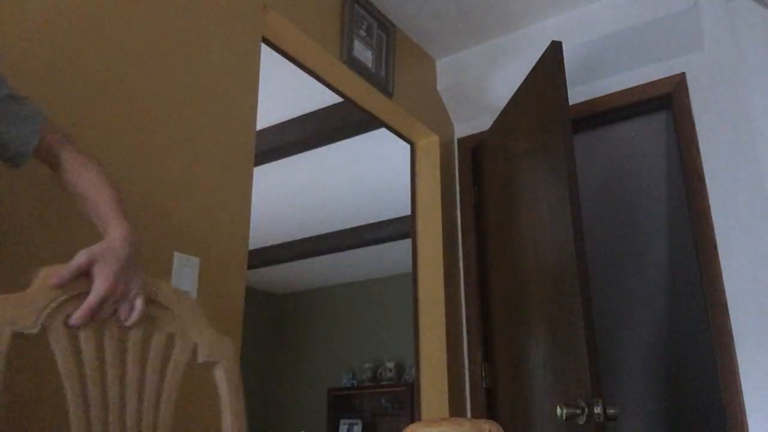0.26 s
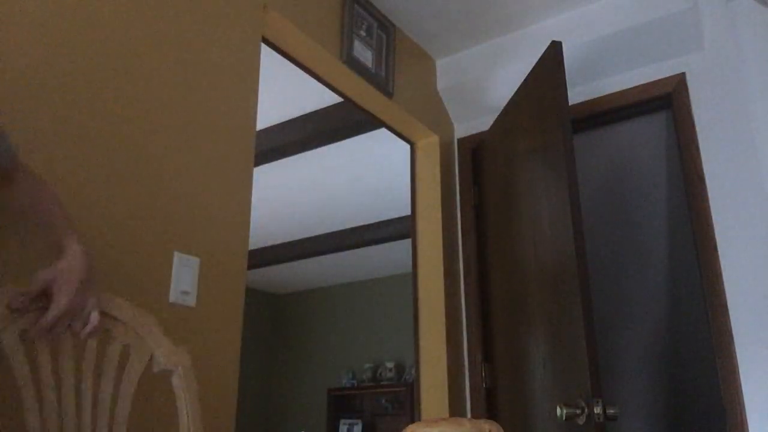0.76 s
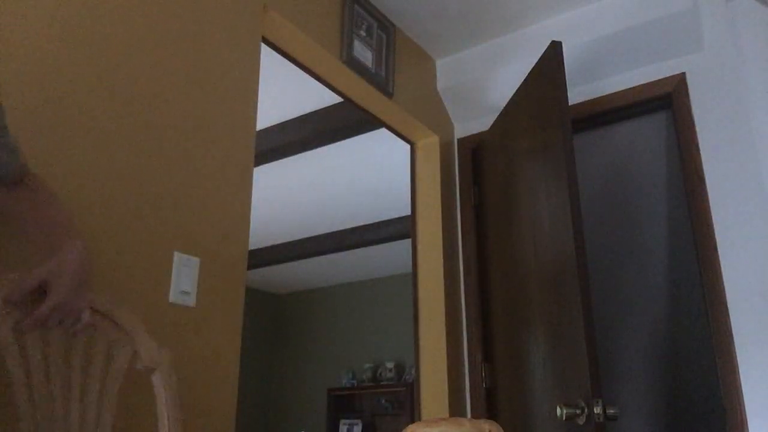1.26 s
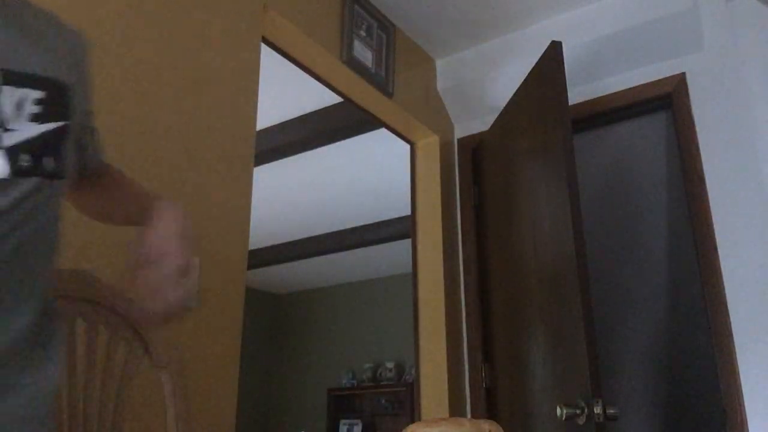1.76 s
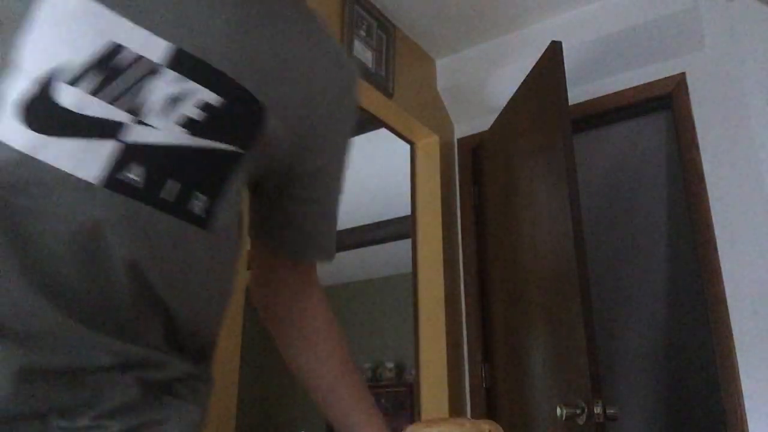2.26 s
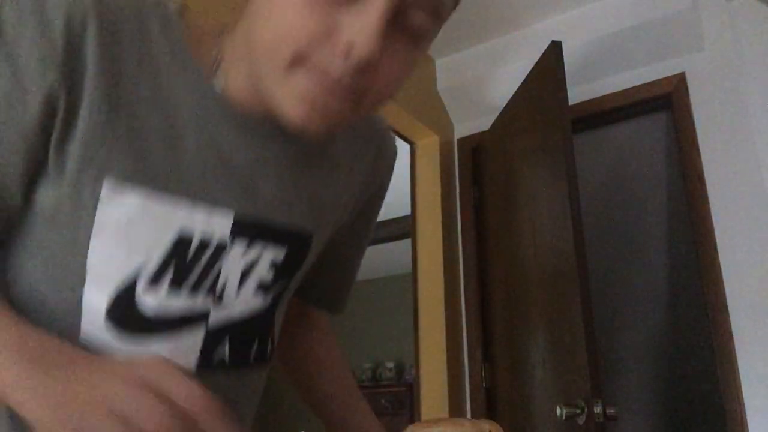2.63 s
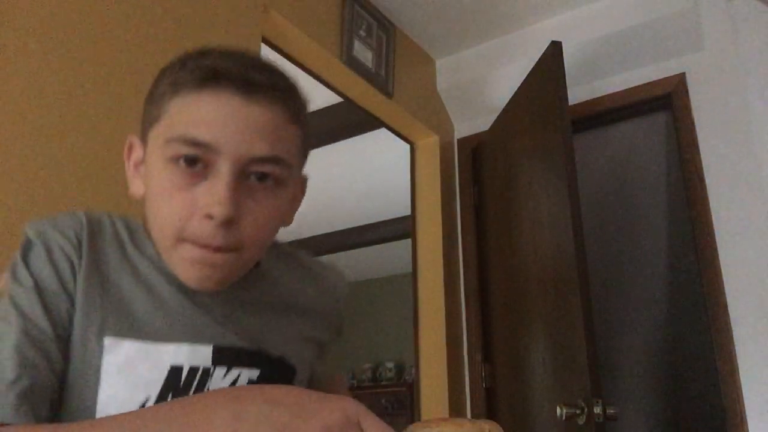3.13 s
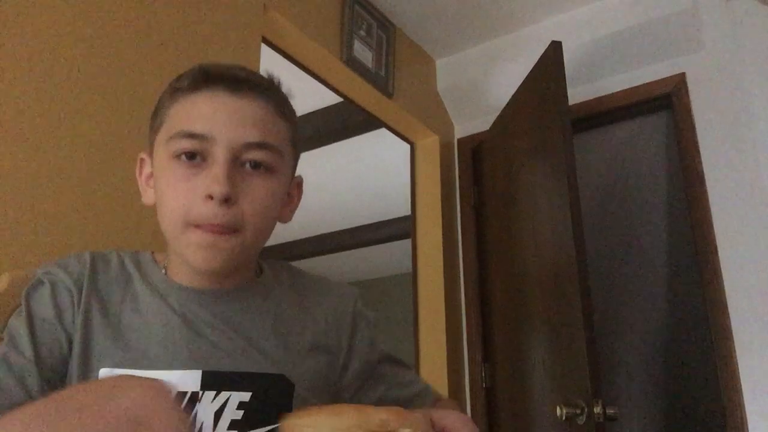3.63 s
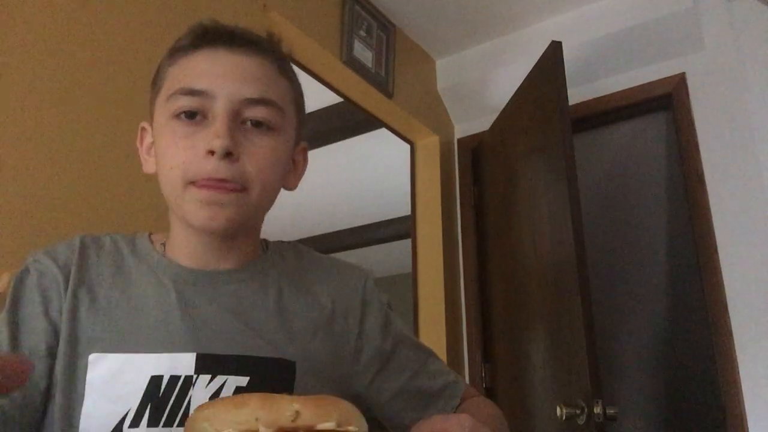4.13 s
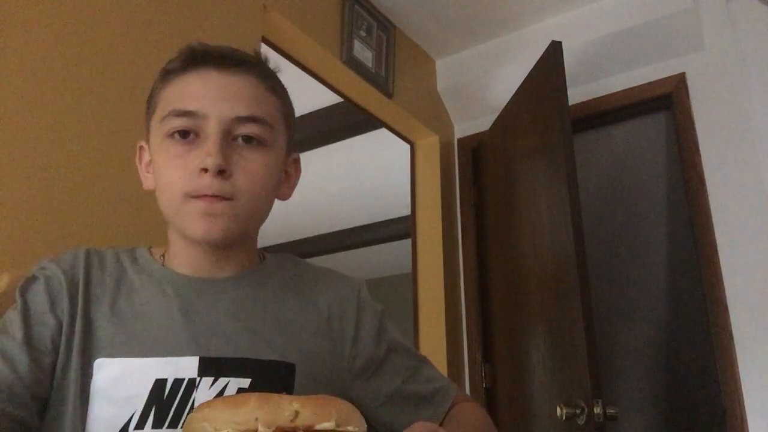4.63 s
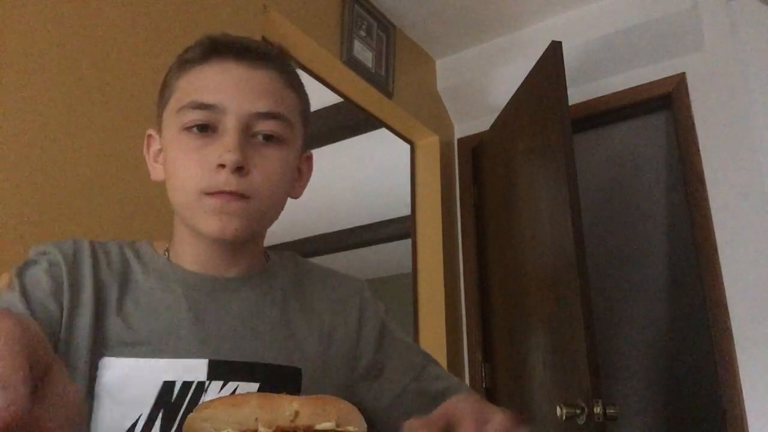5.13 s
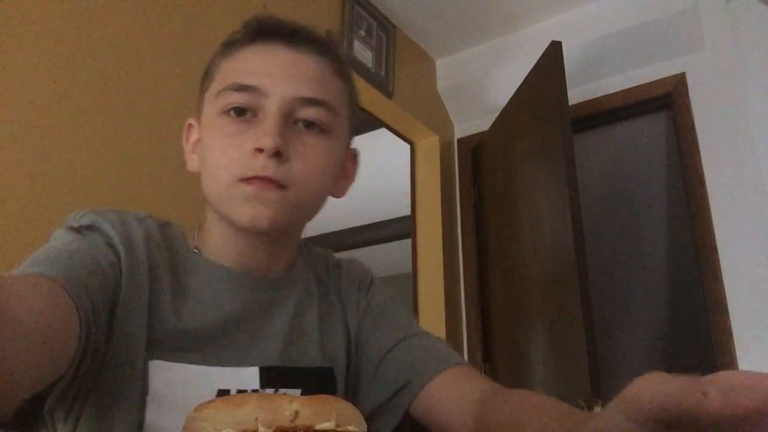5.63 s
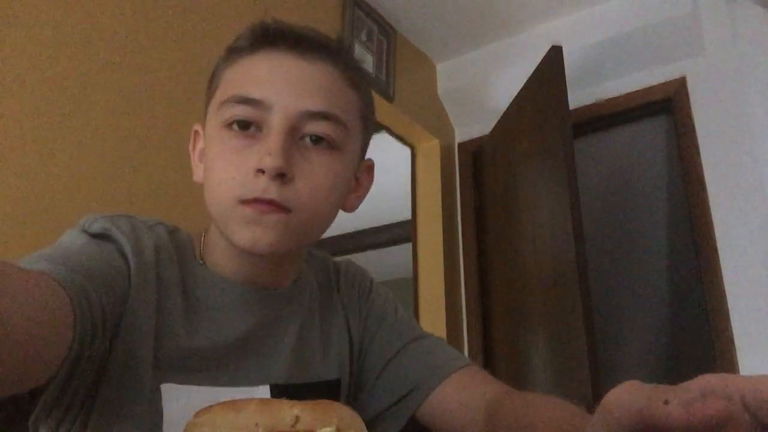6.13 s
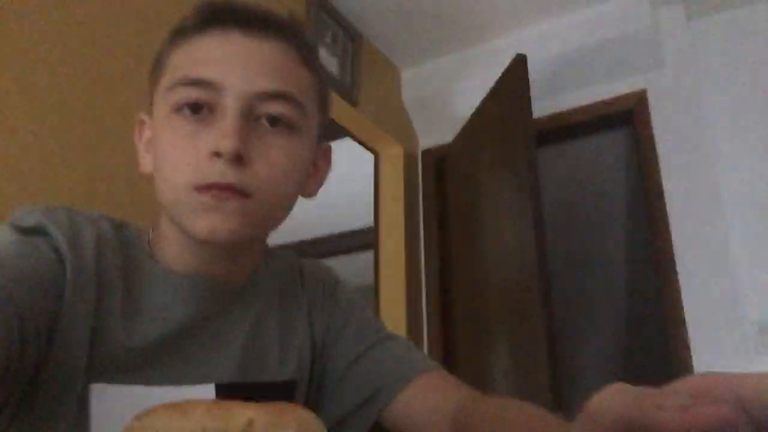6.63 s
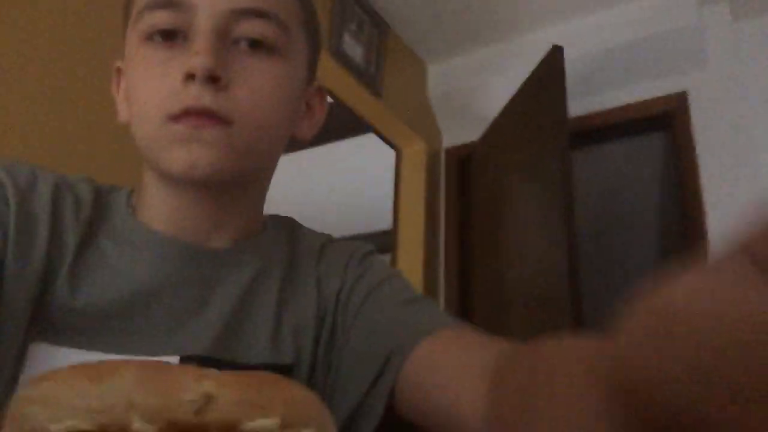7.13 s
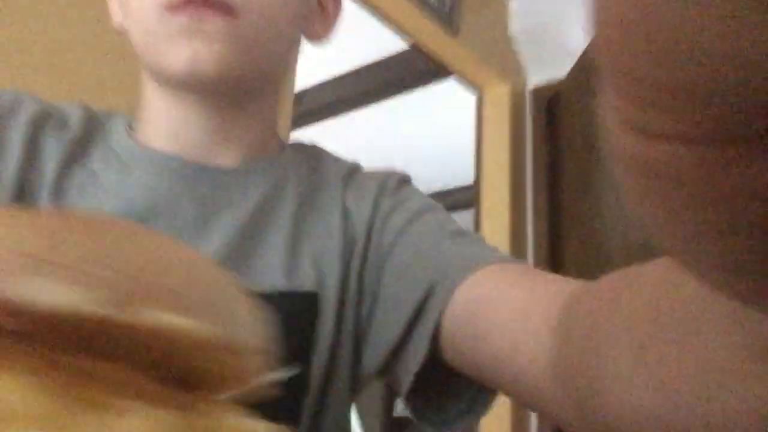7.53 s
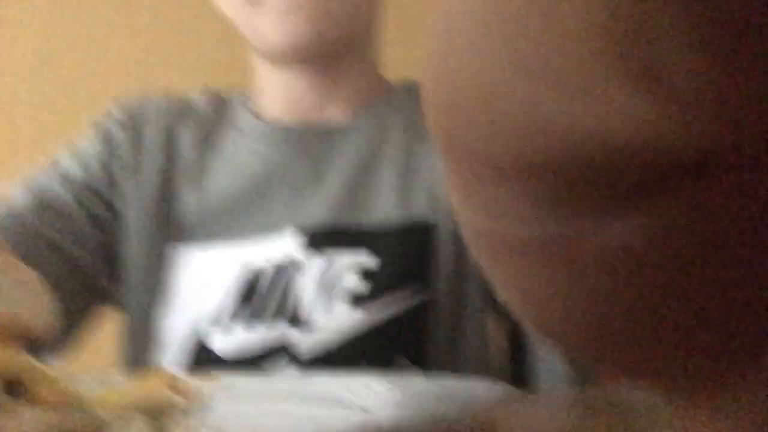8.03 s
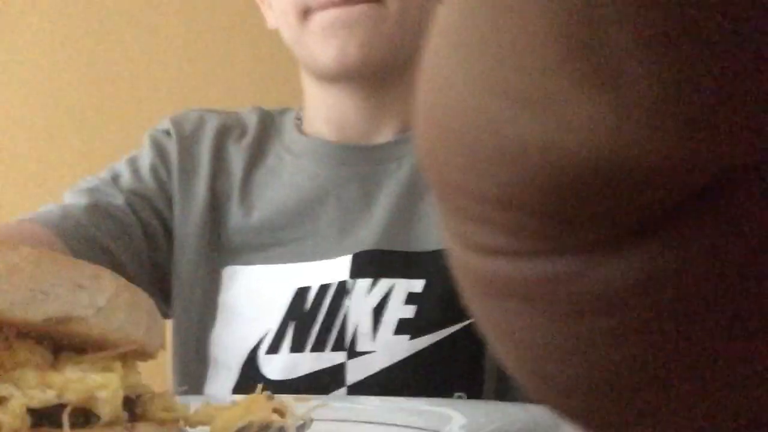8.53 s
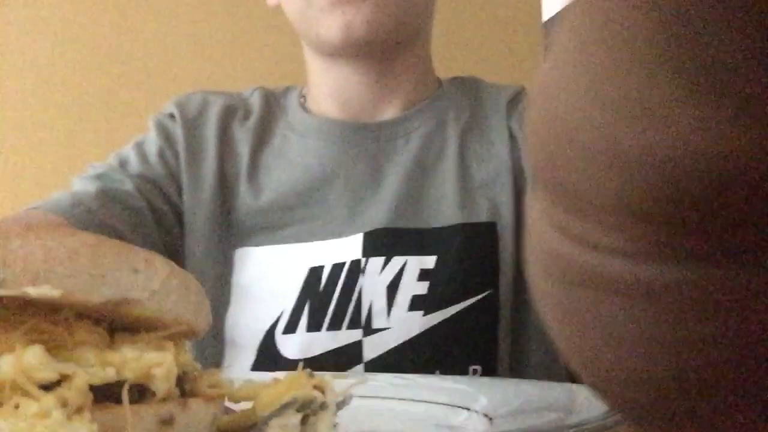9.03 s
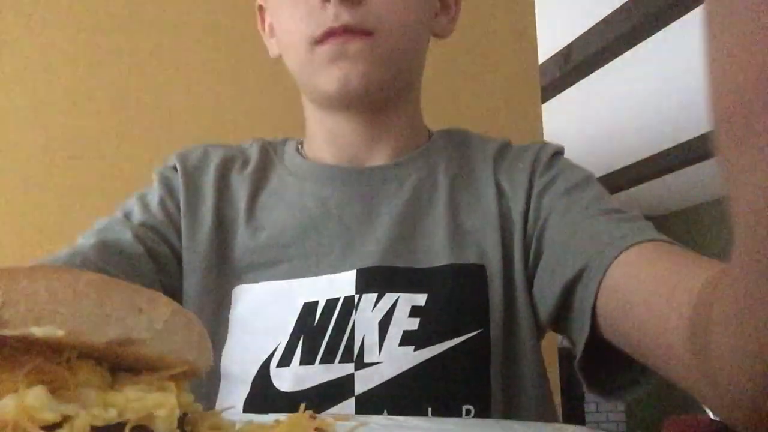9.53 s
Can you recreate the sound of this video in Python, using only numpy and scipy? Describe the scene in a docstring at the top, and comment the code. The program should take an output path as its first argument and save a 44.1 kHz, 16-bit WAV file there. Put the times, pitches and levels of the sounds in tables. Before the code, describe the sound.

Juddering chair-leg scrape, table knocks and a china plate landing, a short groaning scoot, then loud close skin rubbing and tapping on the recorder's case.

```python
"""A wooden chair is dragged over a kitchen floor in two pulls: stick-slip pulses ring its frame and grit.
Knocks sound at the table, a plate slides, lands and chatters on it, and the loaded chair is scooted in.
Then hands grab the recorder: skin rubs, skips and taps on its case as dispersed, thudding contacts.
Faint hum, clothes and room air lie underneath."""
import sys
import numpy as np
from scipy import signal
from scipy.fft import rfft, irfft, next_fast_len
from scipy.io import wavfile
from scipy.ndimage import uniform_filter1d, map_coordinates

SR = 44100
rng = np.random.default_rng(int(sys.argv[2]) if len(sys.argv) > 2 else 0)


def pcm_store(signal):
    """Save signal as 16-bit PCM."""
    levels = np.round(np.clip(np.atleast_2d(signal), -1, 1) * 32767)
    wavfile.write(sys.argv[1], SR, levels.astype(np.int16).T)


N = 431298

# Two pulls on the chair. Each row: time in seconds, frame boom in dB, grit in dB, both before trim.
PULLS = [
    [(0.0, -44, -58.5), (0.044, -29.5, -38), (0.182, -19, -41), (0.296, -15, -34), (0.476, -17.5, -31),
     (0.706, -26.5, -36.5), (0.81, -41.5, -61.5), (1.124, -58.5, -85), (1.15, -57, -83)],
    [(1.15, -57, -76), (1.204, -60, -83), (1.28, -25.5, -47.5), (1.348, -20.5, -38), (1.408, -25, -39),
     (1.516, -20.5, -36), (1.616, -38, -49), (1.874, -53, -80), (2.05, -71, -88)],
]
# Leg stick-slip. Each row: time in seconds, nominal slips per second, unevenness 0-1, upper harmonics in dB.
LEG_SLIP = [(0, 132, .05, -20), (.07, 130, .1, -20), (.13, 92, .3, -22), (.52, 90, .22, -14),
            (.61, 88, .05, 1), (.77, 90, .05, 2), (.88, 93, .1, -14), (1.25, 88, .12, -18),
            (2, 90, .2, -14)]
# Chair frame resonances. Each row: centre in Hz, width in Hz, relative level in dB.
FRAME_MODES = [(157, 20, 4), (192, 20, 2), (228, 22, -1), (262, 18, 1), (313, 26, -17), (440, 20, -26),
               (560, 40, -21)]
# Grit spectrum. Each row: frequency in Hz, relative level in dB.
GRIT_SPECTRUM = [(200, -15), (400, -12), (600, 2), (800, 3), (1000, 0), (1500, -5), (2100, -11),
                 (3200, -20), (5000, -30.5), (9000, -56.5)]
# Sandy hiss spectrum. Each row: frequency in Hz, relative level in dB.
SAND_SPECTRUM = [(1500, -18), (3500, 1), (4600, -6.5), (7000, -5.5), (8500, -17.5), (12300, -22.5),
                 (14500, -47)]
# A foot catches and hisses more. Each row: time in seconds, extra hiss in dB.
FOOT_CATCHES = [(0.02, 16), (0.265, 8.5), (0.33, 10), (0.465, 10), (0.83, 19), (1.29, 7), (1.5, 11.5)]
SAND_RE_GRIT_DB, CATCH_DECAY_S = -22.5, .066  # decay: time constant of the extra dB
# One leg judders steadily. Each row: start in seconds, end in seconds, level in dB before trim.
LEG_JUDDERS = [(0.045, 0.1, -26.5), (0.13, 0.42, -31), (0.46, 0.71, -26.5), (0.87, 0.99, -41),
               (1.29, 1.52, -26), (1.6, 1.92, -52.5)]
JUDDER_ATTACK_S_PER_20DB, JUDDER_RELEASE_S_PER_20DB = .06, .09

# Appliance hum. Each row: frequency in Hz, mean level in dB.
APPLIANCE_HUM = [(48.4, -62.5), (145.3, -69.5), (296.1, -74)]
# Room air spectrum. Each row: frequency in Hz, relative level in dB.
AIR_SPECTRUM = [(20, -33), (45, -6), (75, -9), (150, -7), (290, -8.5), (480, -17.5), (900, -20.5),
                (2000, -29), (6500, -35.5), (10000, -41), (16000, -40)]
# Clothes rustle. Each row: start in seconds, end in seconds, mean level in dB.
CLOTHES_RUSTLES = [(2.42, 2.8, -74.5), (2.9, 3.15, -68), (5.53, 5.7, -71.5), (9.35, 9.78, -72.5)]
RUSTLE_FADE_S_PER_20DB = .2
# Kitchen reverberation. Each row: frequency in Hz, time to fall 60 dB in seconds.
KITCHEN_DECAY = [(100, 0.55), (2000, 0.28), (6000, 0.13), (13000, 0.12)]

# Knocks at the table. Each row: time in seconds, wood in dB, bright part in dB, both before trim.
TABLE_KNOCKS = [(2.42, -44, -72), (2.885, -42.5, -62), (3.015, -54, -59), (3.105, -53.5, -50),
                (3.264, -49.5, -75), (3.403, -29.5, -38), (3.609, -16.5, -58), (3.619, -21.5, -24.5),
                (3.633, -28, -24.5), (3.722, -27, -37), (4.115, -40, -65), (4.768, -43, -41),
                (5.54, -55, -49), (5.67, -53, -60)]
# Table wood spectrum. Each row: frequency in Hz, relative level in dB.
TABLE_SPECTRUM = [(60, -26), (120, -5.5), (165, 1.5), (245, -1.5), (340, 2), (400, 2), (500, -7), (700, -8),
                  (1050, -5), (1700, -17), (2500, -22), (4000, -24.5), (8000, -59.5)]
# Bright part of a knock. Each row: frequency in Hz, relative level in dB.
CRACK_SPECTRUM = [(1500, -15), (3200, 1), (4200, -0.5), (6500, -8.5), (8500, -22), (12000, -27),
                  (16000, -42)]
# The plate slides on the table. Values: start in seconds, end in seconds, rumble in dB, chatter in dB.
PLATE_SLIDE = (3.39, 3.5, -41.5, -58)
# The plate rocks to rest on its rim. Values: start in seconds, end in seconds, rumble in dB, chatter in dB.
PLATE_SETTLE = (3.635, 3.645, -27.5, -28.5)
RUMBLE_ATTACK_S_PER_20DB, RUMBLE_RELEASE_S_PER_20DB = .06, .33
CHATTER_ATTACK_S_PER_20DB, CHATTER_RELEASE_S_PER_20DB = .018, .16
# The plate lands. Each row: time in seconds, snap in dB, thud in dB, nominal thud pitch in Hz.
PLATE_LANDING = [(3.6018, -4, -11, 430)]
# Plate resonances. Each row: centre in Hz, width in Hz, relative level in dB.
CHINA_MODES = [(1210, 70, 1), (2680, 140, -2), (3510, 55, 4), (3650, 60, 2), (4365, 55, 2.5),
               (5000, 200, -14), (6000, 350, -12), (7327, 130, -15), (9679, 80, -15), (11030, 160, -17),
               (12470, 200, -17)]
CHINA_DENSE_DB = -4  # its many weaker modes, relative to those

# Scooting in under load. Values: start in seconds, end in seconds.
SCOOT_SPAN = (4.475, 4.794)
# Loaded chair resonances. Each row: centre in Hz, width in Hz, relative level in dB.
LOADED_MODES = [(201, 11.5, 6), (205, 26, -3), (244.5, 17, 0.5), (312, 61, -10), (455, 38, -5.5),
                (585, 18, -8.5), (613, 19, -14), (731, 8.7, -5), (855, 37, -36), (1214, 120, -16),
                (2470, 960, -59)]
# Chair feet resonances. Each row: nominal centre in Hz, width in Hz, relative level in dB.
FEET_MODES = [(4430, 180, 0), (5170, 780, -15), (6880, 530, -18), (9530, 160, -14.5), (11450, 420, -19.5),
              (12300, 300, -22)]
# levels hold at mid-scoot
GROAN_DB, GROAN_SWELL_DB_PER_S = -33.5, 29
GROAN_ATTACK_S_PER_20DB, GROAN_RELEASE_S_PER_20DB = .071, .056
FEET_DB, FEET_SWELL_DB_PER_S = -55.5, 16.5
FEET_ATTACK_S_PER_20DB, FEET_RELEASE_S_PER_20DB = .11, .07
FEET_SAG_PER_S = .07  # share of pitch lost per second

# Skin strokes on the case. Each row: start in seconds, end in seconds, friction in dB, palm in dB before trim.
SKIN_RUBS = [(6.11, 6.15, -53.5, -40), (6.23, 6.28, -63, -40.5), (6.4, 6.47, -39.5, -35),
             (6.5, 6.58, -33, -32.5), (6.62, 6.97, -28, -28.5), (7.0, 7.27, -34, -29),
             (7.32, 7.41, -27, -20.5), (7.43, 7.56, -30.5, -15), (7.58, 7.67, -38, -22.5),
             (7.7, 7.87, -43, -32.5), (7.9, 8.16, -47.5, -26), (8.5, 8.57, -52.5, -48),
             (8.68, 8.74, -45.5, -42.5), (8.78, 8.92, -57.5, -43.5), (9.14, 9.29, -57, -48)]
RUB_ATTACK_S_PER_20DB, RUB_RELEASE_S_PER_20DB = .048, .055
# Skin friction spectrum. Each row: frequency in Hz, relative level in dB.
SKIN_SPECTRUM = [(410, -9), (700, -2), (1100, -8.5), (1700, -6), (2500, -6.5), (3300, -9.5), (4900, -18),
                 (7500, -22), (8800, -34), (10000, -51), (11500, -46.5), (15600, -65.5)]
# Palm drag spectrum. Each row: frequency in Hz, relative level in dB.
PALM_SPECTRUM = [(40, -15), (150, -2), (320, 5), (600, 3.5), (1000, -7), (2500, -39.5)]
SKIP_LIMIT_DB = -25  # cap on the small skips, before trim
# Light palm slides. Each row: start in seconds, end in seconds, swish in dB, fizz in dB before trim.
PALM_SWISHES = [(6.6, 6.68, -40, -50), (6.92, 7.0, -42, -53), (8.2, 8.24, -44, -61), (8.26, 8.35, -38, -55),
                (8.43, 8.55, -44.5, -64), (8.67, 8.73, -44, -66), (8.77, 8.92, -53, -78)]
SWISH_ATTACK_S_PER_20DB, SWISH_RELEASE_S_PER_20DB = .044, .065
# Swish spectrum. Each row: frequency in Hz, relative level in dB.
SWISH_SPECTRUM = [(350, 5.5), (800, 0), (1700, 2), (2500, 5), (3300, 1), (4400, 1), (5200, -6.5),
                  (6200, -5.5), (7200, -12.5), (10000, -21)]
# Fizz spectrum. Each row: frequency in Hz, relative level in dB.
FIZZ_SPECTRUM = [(6000, -35), (9000, -6), (11300, 3.5), (16000, -16.5)]
# The case flexes under hard presses. Each row: start in seconds, end in seconds, level in dB.
CASE_PRESSES = [(6.07, 6.09, -43), (7.4, 7.62, -31.5), (7.91, 8.16, -29.5), (9.28, 9.3, -38)]
# Case flex spectrum. Each row: frequency in Hz, relative level in dB.
FLEX_SPECTRUM = [(25, -20), (60, -0.5), (100, 0), (160, -10), (300, -35), (1000, -90), (3000, -120)]
PRESS_FADE_S_PER_20DB = .06
# Finger contacts. Each row: time in seconds, snap in dB, tick in dB, thud in dB, nominal thud pitch in Hz.
FINGER_TAPS = [(6.1456, -17.5, -28, -23, 300), (6.1579, 0, -28, -6, 305), (6.381, -6, -29, -7, 290),
               (6.5099, -33, -29, -11.5, 255), (6.7328, -16.5, -11, -26, 290), (6.8644, -12, -15, -37, 270),
               (7.0888, -4, -9.5, -6, 410), (7.0927, -3, -3, 2.5, 410), (7.2607, -8.5, -17, -21, 275),
               (7.3847, -9.5, -16.5, -8.5, 270), (7.4105, -7, -26, -9, 265), (7.4527, -4, -22, 4, 265),
               (7.4872, -3.5, -16.5, -13, 260), (7.5147, -4, -9, -21.5, 260),
               (7.5372, -15.5, -23, -3.5, 260), (7.5716, -7.5, -19.5, -14, 270),
               (7.6368, -10, -38, -12, 325), (7.7953, -11, -19.5, -36, 300), (7.8293, -16.5, -30, -35, 295),
               (7.904, -4.5, -42, -12, 265), (7.9183, -8, -24.5, -8.5, 215),
               (7.9859, -11, -21.5, -14.5, 150), (8.0378, -16, -33.5, -20, 155),
               (8.0812, -12.5, -41, -22, 160), (8.123, -4, -29, -10.5, 285), (8.1376, -9, -31, -8, 190),
               (8.463, -17.5, -29.5, -34, 120), (8.5782, -44, -46, -23, 105),
               (8.6475, -22.5, -30.5, -32, 120), (8.725, -21.5, -16.5, -7.5, 140),
               (8.815, -21.5, -29.5, -40, 140), (8.8789, -25.5, -41, -13.5, 140),
               (9.133, -20, -24.5, -31, 140), (9.1613, -23, -49, -38, 140), (9.198, -17, -27, -21.5, 380),
               (9.2047, -21, -20, -7, 145), (9.2831, -38, -45, -30, 130), (9.335, -40, -65, -55, 140)]
# Contact snap spectrum. Each row: frequency in Hz, relative level in dB.
SNAP_SPECTRUM = [(150, -28.5), (450, 5), (800, 2.5), (1500, -0.5), (2800, -12.5), (5000, -33),
                 (10000, -50.5)]
# Bright edge of a contact. Each row: frequency in Hz, relative level in dB.
TICK_SPECTRUM = [(1500, -20), (3200, 0), (6300, -2), (8500, -17), (11500, -20), (16000, -37)]
CONTACT_LEAD_S = 1 / 100  # time before a contact bites
# Runs of even fingertip skips. Each row: first in seconds, last in seconds, nominal period in seconds,
# then mid-run snap, tick and thud in dB.
FINGER_STUTTERS = [(6.573, 6.677, .0173, -11, -15, 0), (6.903, 6.993, .018, -13, -17, 4),
                   (7.135, 7.2, .022, -19.5, -16, -1), (7.637, 7.688, .017, -23.5, -39, -17.5),
                   (8.914, 9.0, .017, -21.5, -28, -37)]
STUTTER_THUD_HZ, STUTTER_ARCH_DB = 275, 13  # nominal pitch; drop from mid-run to the ends
STUTTER_SCATTER_DB, STUTTER_SCATTER_LOG_PITCH = 2, .05
# Colour under a finger over the microphone port. Each row: frequency in Hz, gain in dB.
COVERED_COLOUR = [(250, 0), (450, 1), (1500, 1), (2600, -3), (4200, 2), (5600, 0), (7200, -8), (10000, 1),
                  (14000, 4)]
COVER_START_S, COVER_FADE_S = 8.43, .04
MUFFLE_HZ, TOP_HZ = 12500, 16000  # steep treble loss, then absolute band limit


def amp(db):
    """Decibels to gain."""
    return 10 ** (np.asarray(db) / 20)


def seconds():
    """Time of every sample."""
    return np.arange(N) / SR


def unit(x):
    """Scale to rms 1."""
    return x / np.sqrt(np.mean(x ** 2) + 1e-20)


def along(points, hz):
    """Interpolate (Hz, value) points on a log frequency axis."""
    f, v = np.transpose(points)
    return np.interp(np.log(hz + 1), np.log(f + 1), v)


def curves(rows):
    """One value per sample for each column after the time."""
    s, *columns = np.transpose(rows)
    return [np.interp(seconds(), s, column) for column in columns]


def gains(rows):
    """dB curves as gains, silent outside their span."""
    t, start, end = seconds(), rows[0][0], rows[-1][0]
    gate = uniform_filter1d(((t >= start) & (t <= end)) * 1., size=400)
    return [gate * amp(curve_db) for curve_db in curves(rows)]


def wobble(rate_hz):
    """Smooth random curve with rate_hz knots a second."""
    knots = rng.standard_normal(int(N * rate_hz / SR) + 4)
    return map_coordinates(knots, [np.arange(N) * rate_hz / SR], order=2)


def filtered(x, response):
    """Multiply the spectrum of x by a complex response of frequency."""
    m = next_fast_len(len(x) + SR // 4)
    return irfft(rfft(x, m) * response(np.fft.rfftfreq(m, 1 / SR)), m)[:len(x)]


def coloured(x, spectrum):
    """Shape x with a spectrum, at rms 1."""
    return unit(filtered(x, lambda hz: amp(along(spectrum, hz))))


def muffled(x, edge_hz):
    """Steep loss of treble."""
    return filtered(x, lambda hz: 1 / np.sqrt(1 + (hz / edge_hz) ** 10))


def band(x, low_hz, high_hz):
    """Keep a band, with steep sides, at rms 1."""
    high_passed = filtered(x, lambda hz: 1 / np.sqrt(1 + (low_hz / (hz + 1)) ** 10))
    return unit(muffled(high_passed, high_hz))


def resonate(x, modes):
    """Drive a parallel bank of damped resonances, at rms 1."""
    def response(f):
        return sum(amp(db) * 1j * f * w / (c * c - f * f + 1j * f * w) for c, w, db in modes)
    return unit(filtered(x, response))


def body(x, t60_s):
    """The many small, close modes of a solid object, even across broad bands, at rms 1."""
    t = np.arange(SR // 8) / SR
    modes = rfft(rng.standard_normal(len(t)) * amp(-60 * t / t60_s))
    modes /= np.sqrt(np.abs(uniform_filter1d(np.abs(modes) ** 2, size=40)))
    return unit(signal.fftconvolve(x, irfft(modes))[:N])


def roaming(x, t60_s):
    """A moving contact point wakes now one set of modes, now another."""
    place = 1.5 * wobble(9)
    return np.cos(place) * body(x, t60_s) + np.sin(place) * body(x, t60_s)


def steadied(x):
    """Friction feeds a vibration until it holds a steady strength: divide by the 50 ms rms."""
    return x / np.sqrt(np.abs(uniform_filter1d(x * x, size=2200)) + 1e-6)


def grains(rate_hz, spread_db):
    """Random tiny impacts of uneven size, at rms 1."""
    hits = rng.random(N) < rate_hz / SR
    return unit(hits * rng.standard_normal(N) * amp(spread_db * rng.standard_normal(N)))


def stroke(start_s, end_s, db, attack_s, release_s, swell_db_per_s=0):
    """Gain of one movement: it rises, holds or swells, and dies away; edge times are per 20 dB."""
    t = seconds()
    outside = np.maximum(start_s - t, 0) / attack_s + np.maximum(t - end_s, 0) / release_s
    swell_db = swell_db_per_s * (np.clip(t, start_s, end_s) - (start_s + end_s) / 2)
    return amp(db + swell_db - 20 * np.minimum(outside, 10))


def strokes(rows, attack_s, release_s):
    """One gain per level column of (start, end, dB, ..) rows; the strongest movement leads."""
    shapes = [stroke(start, end, 0, attack_s, release_s) for start, end, *_ in rows]
    levels = np.transpose(rows)[2:]
    return [np.max([amp(db) * shape for db, shape in zip(column, shapes)], axis=0) for column in levels]


def add(track, s, sound):
    """Mix a sound in at time s."""
    part = track[max(round(s * SR), 0):][:len(sound)]
    part += sound[:len(part)]


def room(x):
    """Kitchen reverberation: noise decaying per frequency, of energy 1, 200 samples late."""
    hz, t, z = signal.stft(rng.standard_normal(SR * 2 // 3), SR, nperseg=256)
    decay = amp(-60 * t / along(KITCHEN_DECAY, hz)[:, None])
    tail = signal.istft(z * decay, SR, nperseg=256)[1]
    return signal.fftconvolve(x, np.pad(tail / np.linalg.norm(tail), (200, 0)))[:N]


def slips(rate_hz, uneven):
    """One push each time a leg lets go of the floor, at rms 1."""
    turns = np.cumsum(rate_hz * np.exp(uneven * wobble(70))) / SR
    return unit(np.diff(np.floor(turns), prepend=0) * amp(3 * rng.standard_normal(N)))


def leg_judder(rate_hz, uneven, upper_db):
    """Pitched stick-slip of one leg: a fundamental with harmonics 3, 5 and 6, flickering in level."""
    phase = 2 * np.pi * np.cumsum(rate_hz * (1 + .2 * uneven * wobble(35))) / SR
    upper = np.sin(3 * phase) + .12 * (np.sin(5 * phase) + np.sin(6 * phase))
    flicker = amp(2.2 * wobble(25.45))
    return flicker * (np.sin(phase) + amp(upper_db + 3.7 * wobble(31.4)) * upper)


def drag():
    """Legs stick and slip: the frame booms, grit crunches at each slip, one leg judders at a pitch."""
    t = seconds()
    boom_gain, grit_gain = np.sum([gains(pull) for pull in PULLS], axis=0)
    catch_db = sum(db * (t > s) * np.exp(-np.abs(t - s) / CATCH_DECAY_S) for s, db in FOOT_CATCHES)
    sand_gain = grit_gain * amp(SAND_RE_GRIT_DB + catch_db)
    judder_gain, = strokes(LEG_JUDDERS, JUDDER_ATTACK_S_PER_20DB, JUDDER_RELEASE_S_PER_20DB)

    rate_hz, uneven, upper_db = curves(LEG_SLIP)
    pushes = slips(rate_hz, uneven) + slips(rate_hz * .87, uneven + .15)
    # each push sets off a burst with a 3.2 ms time constant
    bursts = unit(signal.lfilter([1], [1, -np.exp(-1 / (.0032 * SR))], pushes))
    crunch_drive = (bursts + 1) * rng.standard_normal(N) + pushes
    crunch = coloured(roaming(crunch_drive, .045), GRIT_SPECTRUM)
    sand = coloured(body((bursts + 1) * rng.standard_normal(N), .043), SAND_SPECTRUM)
    boom = steadied(band(resonate(pushes, FRAME_MODES), 90, 520))

    legs = amp(-1.0) * boom_gain * boom + amp(1.5) * grit_gain * crunch + sand_gain * sand
    judder = amp(3.0) * judder_gain * leg_judder(rate_hz, uneven, upper_db)
    return legs + amp(-15.5) * room(legs) + judder


def appliance_hum():
    """Sines, each drifting in level and phase."""
    t, hum = seconds(), np.zeros(N)
    for hz, db in APPLIANCE_HUM:
        phase = 2 * np.pi * hz * t + .3 * wobble(2.2)
        hum += amp(db + 3.3 * wobble(8.5)) * np.sqrt(2) * np.sin(phase)
    return hum


def background():
    """Room air as shaped noise, an appliance's hum, and faint clothes as grains."""
    rustle_gain, = strokes(CLOTHES_RUSTLES, RUSTLE_FADE_S_PER_20DB, RUSTLE_FADE_S_PER_20DB)
    cloth = amp(2 * wobble(13)) * rustle_gain * coloured(grains(6000, 3), SKIN_SPECTRUM)
    air = amp(-64) * coloured(rng.standard_normal(N), AIR_SPECTRUM)
    return appliance_hum() + cloth + air


def table_knocks():
    """Struck wood: a short bright crack over a longer low ring, both decaying noise."""
    out, t = np.zeros(N), np.arange(SR // 2) / SR
    rise = 1 - np.exp(-t / .0046)
    for s, wood_db, bright_db in TABLE_KNOCKS:
        crack = coloured(rng.standard_normal(len(t)), CRACK_SPECTRUM) * amp(-60 * t / .081)
        wood = coloured(rng.standard_normal(len(t)), TABLE_SPECTRUM) * amp(-60 * t / .26)
        add(out, s, (amp(bright_db - 4.5) * crack + amp(wood_db - 5.5) * wood) * rise)
    return out


def contact(snap_db, tick_db, thud_db, thud_hz):
    """A bending wave in a thin shell: the treble arrives first, then the pitch falls to a low thud."""
    t = np.arange(SR // 8) / SR - CONTACT_LEAD_S
    # the contact scuffs just before and after it bites
    scuff = amp(-60 * np.maximum(t / .016, -t / .007))
    bite = signal.unit_impulse(len(t), round(CONTACT_LEAD_S * SR))
    blow = bite + .079 * rng.standard_normal(len(t)) * scuff

    # dispersion: delay is travel / sqrt(Hz)
    travel = .03 * np.exp(.17 * rng.standard_normal())
    turn = rng.uniform(0, 2 * np.pi)

    def dispersed(spectrum):
        def response(hz):
            return amp(along(spectrum, hz)) * np.exp(1j * (turn - 4 * np.pi * travel * np.sqrt(hz)))
        x = filtered(blow, response)
        return x / np.abs(x).max()

    # the thud starts at 1.43 times thud_hz and settles at 0.85 times
    age = np.maximum(t - .4 / thud_hz, 0)
    rise = 1 - np.exp(-(age / (.0016 + .1 / thud_hz)) ** 2)
    swell = rise * amp(-60 * age * thud_hz / 4.96)  # 60 dB down in 4.96 nominal cycles
    turns = thud_hz * (.85 * age + .0014 * (1 - np.exp(-age / .0024)))
    thud = swell / swell.max() * np.sin(2 * np.pi * turns)
    return amp(snap_db) * dispersed(SNAP_SPECTRUM) + amp(tick_db) * dispersed(TICK_SPECTRUM) + amp(thud_db) * thud


def plate_motion():
    """Sliding and rocking: table rumble, and grains ringing the plate's modes."""
    moves = [PLATE_SLIDE, PLATE_SETTLE]
    rumble_gain = strokes(moves, RUMBLE_ATTACK_S_PER_20DB, RUMBLE_RELEASE_S_PER_20DB)[0]
    chatter_gain = strokes(moves, CHATTER_ATTACK_S_PER_20DB, CHATTER_RELEASE_S_PER_20DB)[1]
    rim = resonate(grains(3000, 2), CHINA_MODES)
    rumble = coloured(body(grains(4000, 2.8), .07), TABLE_SPECTRUM)
    chatter = steadied(band(rim + amp(CHINA_DENSE_DB) * body(rim, .06), 900, 8500))
    return rumble_gain * rumble + chatter_gain * chatter


def plate():
    """Table knocks, the plate's sliding and chatter, and its muffled landing, in the room."""
    out = table_knocks() + plate_motion()
    for s, snap_db, thud_db, thud_hz in PLATE_LANDING:
        add(out, s - CONTACT_LEAD_S, muffled(contact(snap_db, -np.inf, thud_db, thud_hz), 2200))
    return out + amp(-11) * room(out)


def scoot():
    """With weight on it the chair groans higher and its feet hiss, sagging in pitch."""
    groan_gain = stroke(*SCOOT_SPAN, GROAN_DB, GROAN_ATTACK_S_PER_20DB, GROAN_RELEASE_S_PER_20DB,
                        GROAN_SWELL_DB_PER_S)
    feet_gain = stroke(*SCOOT_SPAN, FEET_DB, FEET_ATTACK_S_PER_20DB, FEET_RELEASE_S_PER_20DB,
                       FEET_SWELL_DB_PER_S)
    # soft slips carry little treble
    soft_spectrum = [(800, 0), (1100, -8), (2000, -9), (4000, -17)]  # Hz, relative dB
    pushes = coloured(.5 * slips(46, .35) + grains(6000, 1), soft_spectrum)
    groan = steadied(band(resonate(pushes, LOADED_MODES), 140, 4200))
    feet = band(resonate(grains(15000, 1), FEET_MODES), 3200, 13000)
    # read the feet at a falling speed
    speed = 1 - FEET_SAG_PER_S * (np.clip(seconds(), *SCOOT_SPAN) - np.mean(SCOOT_SPAN))
    sagging_feet = map_coordinates(feet, [np.cumsum(speed)], order=3)
    legs = groan_gain * groan + feet_gain * sagging_feet
    return legs + amp(-11.5) * room(legs)


def skin_rubs():
    """Skin drags over the case: fine friction grains, coarse palm grains and small uneven skips."""
    friction_gain, palm_gain = strokes(SKIN_RUBS, RUB_ATTACK_S_PER_20DB, RUB_RELEASE_S_PER_20DB)
    friction = coloured(roaming(grains(4000, 2.5), .013), SKIN_SPECTRUM) * amp(2.2 * wobble(70))
    palm = muffled(coloured(grains(900, 5.3), PALM_SPECTRUM), 4000)
    skip = muffled(contact(0, -23.5, -4.5, 330), 6000)
    skips = unit(signal.fftconvolve(grains(130, .96), skip)[round(CONTACT_LEAD_S * SR):][:N])
    skip_gain = np.minimum(palm_gain, amp(SKIP_LIMIT_DB))
    return friction_gain * friction + amp(-4.5) * palm_gain * palm + amp(-6.5) * skip_gain * skips


def palm_swishes():
    """A palm slides lightly along the case: grains through roaming modes, with treble fizz."""
    swish_gain, fizz_gain = strokes(PALM_SWISHES, SWISH_ATTACK_S_PER_20DB, SWISH_RELEASE_S_PER_20DB)
    swish = coloured(roaming(grains(3900, 3), .018), SWISH_SPECTRUM)
    fizz = coloured(grains(6000, 3.5), FIZZ_SPECTRUM)
    return swish_gain * swish + amp(-3.5) * fizz_gain * fizz


def case_flex():
    """The case flexes and rumbles where the hand presses hard: steadied low grains."""
    press_gain, = strokes(CASE_PRESSES, PRESS_FADE_S_PER_20DB, PRESS_FADE_S_PER_20DB)
    return press_gain * steadied(coloured(grains(900, 2), FLEX_SPECTRUM))


def finger_contacts():
    """Fingertips tap singly or stutter in even runs of skips, strongest mid-run."""
    taps = np.zeros(N)
    for s, *tap in FINGER_TAPS:
        add(taps, s - CONTACT_LEAD_S, contact(*tap))
    for first_s, last_s, period_s, *levels_db in FINGER_STUTTERS:
        span_s = last_s - first_s
        for place in np.linspace(-1, 1, round(span_s / period_s) + 1):
            scatter_db = rng.normal(0, STUTTER_SCATTER_DB, size=3)
            skip_db = np.array(levels_db) - STUTTER_ARCH_DB * place ** 2 + scatter_db
            thud_hz = STUTTER_THUD_HZ * np.exp(rng.normal(0, STUTTER_SCATTER_LOG_PITCH))
            s = (first_s + last_s + place * span_s) / 2
            add(taps, s - CONTACT_LEAD_S, contact(*skip_db, thud_hz))
    return taps + amp(-27) * room(taps)


def hands():
    """All handling reaches the microphone through the case."""
    return skin_rubs() + palm_swishes() + case_flex() + finger_contacts()


def covered(x):
    """A finger over the port changes the colour of the handling."""
    share = np.clip((seconds() - COVER_START_S) / COVER_FADE_S, 0, 1)
    return x + share * (filtered(x, lambda hz: amp(along(COVERED_COLOUR, hz))) - x)


def scene():
    """Everything at the one microphone."""
    return (drag() + background() + plate() + scoot() + covered(hands()))[None]


def record(dry, ceiling=.72, hardness=6):
    """The input rounds off the highest peaks, loses treble and keeps nothing above its band limit."""
    x = dry[0] / (1 + np.abs(dry[0] / ceiling) ** hardness) ** (1 / hardness)
    return filtered(muffled(x, MUFFLE_HZ), lambda hz: hz < TOP_HZ)[None]


dry = scene()
out = record(dry)
pcm_store(out)
```